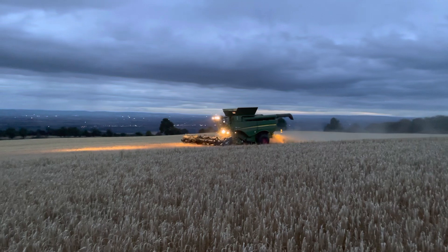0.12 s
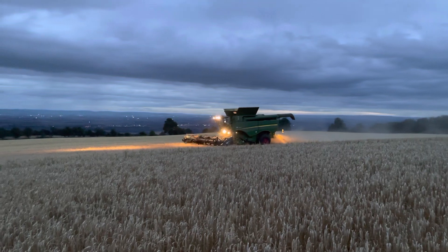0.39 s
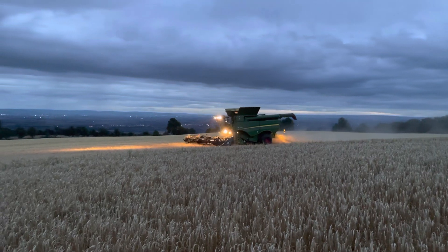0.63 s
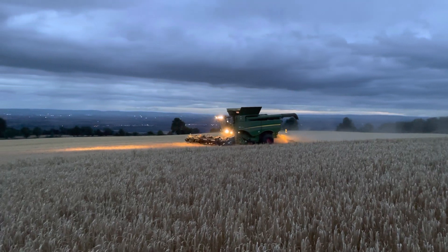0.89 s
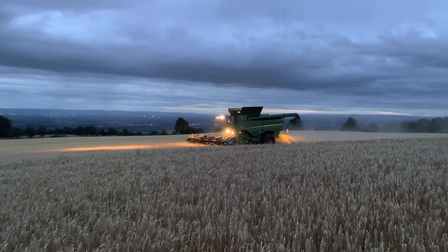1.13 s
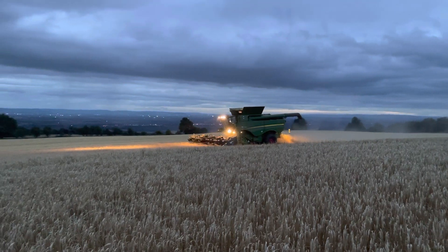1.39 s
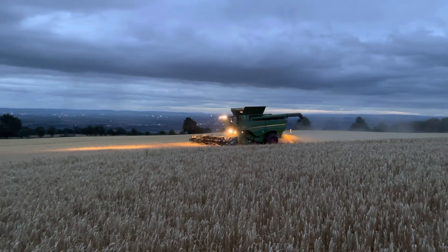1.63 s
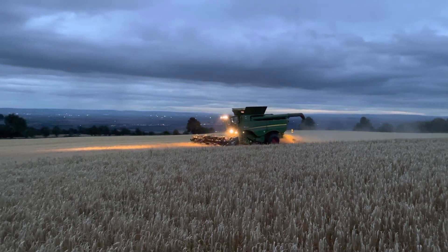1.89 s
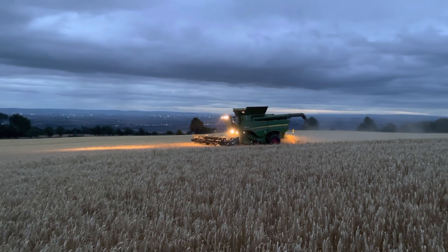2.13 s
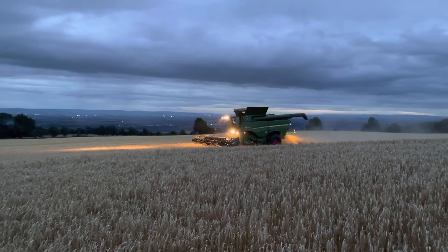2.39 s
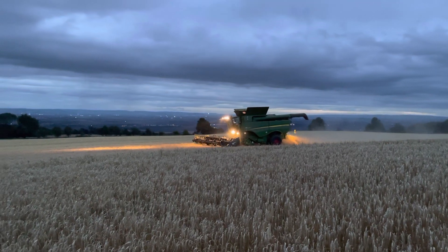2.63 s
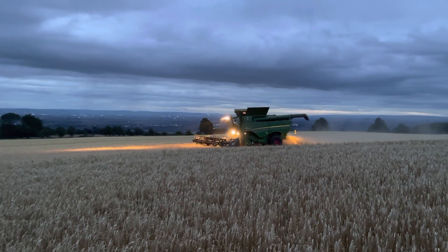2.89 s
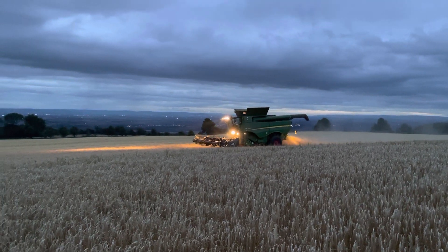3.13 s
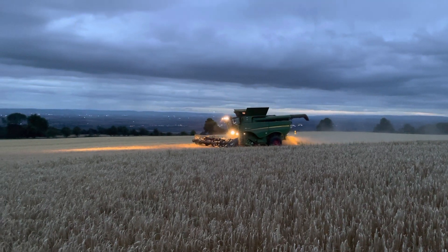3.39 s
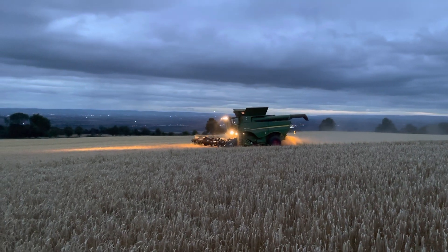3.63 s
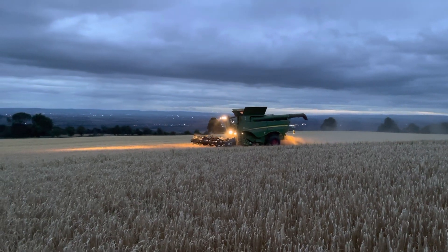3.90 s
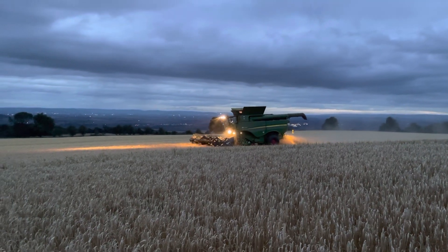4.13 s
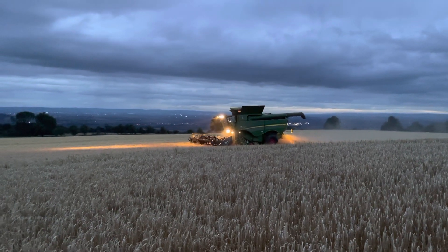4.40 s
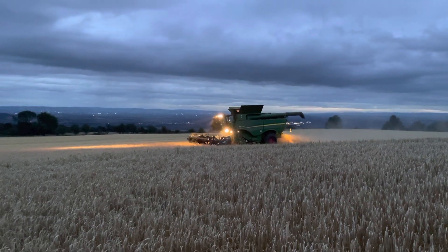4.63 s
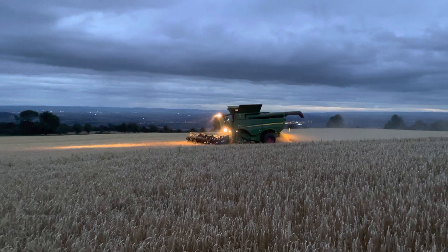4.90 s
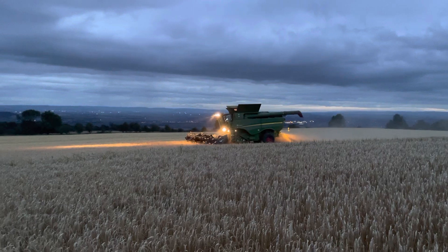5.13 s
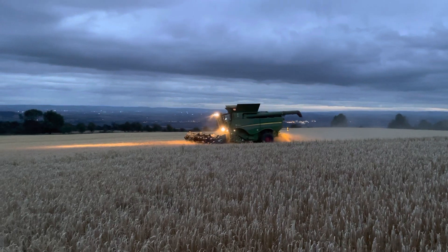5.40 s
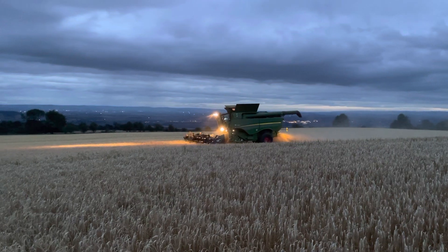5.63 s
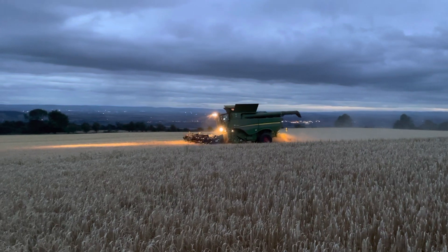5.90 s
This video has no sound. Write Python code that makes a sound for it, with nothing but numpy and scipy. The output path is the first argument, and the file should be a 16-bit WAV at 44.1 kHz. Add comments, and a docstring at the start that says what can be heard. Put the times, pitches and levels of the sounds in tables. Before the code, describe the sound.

Continuous harvester noise outdoors, at a distance, picked up by a phone in stereo. Low, smooth engine humming and heavy machinery roar dominate from beginning to end, flickering only slightly. Over them lie faint gear and rotor tones, an unsteady whine that weakens after the first couple of seconds, a very thin turbo whistle, and airy straw hiss that settles a little, then brightens. The middle range is weaker on the right.

```python
"""Combine harvester in a wheat field

A combine works some way off at steady engine speed, heard on a two-port phone. A six-cylinder diesel drones
under chopper, rotor and gear tones, a pump whine and a thin turbo whistle, all sums of unsteady sines.
Machinery roars and chopped straw hisses, both as coloured noise swelling and flickering in half-octave bands.
The right channel hears the middle range weaker and again three milliseconds late."""
import sys
import numpy as np
from scipy import signal
from scipy.fft import rfft, irfft
from scipy.io import wavfile
from scipy.ndimage import uniform_filter1d

SR = 44100
rng = np.random.default_rng(int(sys.argv[2]) if len(sys.argv) > 2 else 0)


def master_out(mix):
    """Clip the mix to full scale and print it as 16-bit PCM to the path in sys.argv[1]."""
    frames = np.transpose(np.atleast_2d(mix))
    ceiling = np.clip(frames, -1, 1)
    pcm = np.round(ceiling * 32767).astype(np.int16)
    wavfile.write(sys.argv[1], SR, pcm)


def level_to_linear(level):
    """Convert decibel levels to linear amplitude factors, elementwise."""
    exponent = np.asarray(level, float) / 20
    return 10 ** exponent


N = 265482  # samples, about 6 s
T = np.arange(N) / SR
BINS = np.fft.rfftfreq(N, 1 / SR)  # Hz


def walk(rate):
    """Random levels held 1 / rate s, smoothed twice into a wander of mean 0 and spread 1."""
    hold = int(SR / rate)
    steps = np.repeat(rng.standard_normal(N // hold + 1), hold)
    wander = uniform_filter1d(uniform_filter1d(steps, hold), hold)[:N]
    return (wander - wander.mean()) / wander.std()


def curves(table):
    """Columns of a time table, drawn as straight lines from sample to sample."""
    seconds, *columns = np.transpose(table)
    return [np.interp(T, seconds, column) for column in columns]


def partials(hz, orders, drift, waver_db, waver_hz):
    """Sines on multiples of one slightly drifting rate; the air between makes each waver."""
    turns = np.cumsum(hz * (1 + drift * walk(waver_hz / 2))) / SR
    total = 0
    for multiple, db in orders:
        level = np.sqrt(2) * level_to_linear(db + waver_db * walk(waver_hz))  # rms to peak
        total = total + level * np.sin(2 * np.pi * (multiple * turns + rng.random()))
    return total


def noise(spectrum, swell_db, swell_hz, flicker_db, flicker_hz):
    """Two unrelated noises of one colour; half-octave bands swell together and flicker alone."""
    hz, db = np.transpose(spectrum)
    octave = np.log2(BINS + 1)
    colour_db = np.interp(octave, np.log2(hz), db, left=-140, right=-140)
    colour = level_to_linear(colour_db) * np.sqrt(SR / 2)  # turns dB per Hz into gain on white noise
    coloured = rfft(rng.standard_normal((2, N))) * colour
    swell = walk(swell_hz)
    total = 0
    for centre in np.arange(np.floor(np.log2(hz[0])), np.log2(hz[-1]) + 1, .5):
        # overlapping bands that add up to one
        band = np.cos(np.pi / 2 * np.clip(2 * (octave - centre), -1, 1)) ** 2
        level_db = swell_db * swell + flicker_db * walk(flicker_hz)
        total = total + irfft(coloured * band, N) * level_to_linear(level_db)
    return total


# Diesel drone around the firing rate: [multiple of the firing rate, rms level/dB]
ENGINE_ORDERS = [(.5, -43.5), (1, -26), (2, -37.5), (3, -57.5), (4, -62)]


def engine():
    """Six-cylinder diesel: firing pulses repeat evenly, so they sound as multiples of the firing rate."""
    return partials(100, ENGINE_ORDERS, drift=0.00041, waver_db=0.0, waver_hz=8)


# Straw chopper tones: [multiple of its turning rate, typical rms level/dB]
CHOPPER_ORDERS = [(5, -29), (6, -39), (12, -57), (18, -53), (27, -55)]


def chopper():
    """The turning straw chopper sounds on multiples of its shaft rate."""
    return partials(42.66, CHOPPER_ORDERS, drift=0.0018, waver_db=0.23, waver_hz=12)


# Threshing rotor tones: [multiple of its turning rate, typical rms level/dB]
ROTOR_ORDERS = [(8, -41.5), (9, -47), (30, -57), (48, -50), (50, -52), (51, -53), (52, -50), (56, -52),
                (68, -53), (74, -58)]


def rotor():
    """The threshing rotor sounds on high multiples of its slow turning rate."""
    return partials(17.54, ROTOR_ORDERS, drift=0.001995, waver_db=2.5, waver_hz=6)


# Lone shaft and gear tones: [f/Hz, typical rms level/dB]
GEAR_TONES = [(54.5, -37), (74.0, -41), (1359, -57), (1777, -57), (1806, -57), (2210, -60), (3545, -63)]


def gears():
    """Lone shaft and gear tones, each drifting and wavering on its own."""
    return sum(partials(hz, [(1, db)], drift=.0015, waver_db=2.0, waver_hz=10) for hz, db in GEAR_TONES)


# Pump whine, course of its first partial: [t/s, typical rms level/dB]
PUMP_LEVEL = [(0, -36.5), (2.4, -38.5), (3.2, -42), (4.4, -45), (4.9, -41.5), (6.02, -43)]
# Weak upper partials of the pump: [multiple of its pitch, typical rms level/dB]
PUMP_UPPER_ORDERS = [(3, -60), (4, -63)]


def pump():
    """The pump whines on a few partials and grows ragged in pitch and level as its first one fades."""
    first_db, = curves(PUMP_LEVEL)
    # the second partial holds for 1.1 s, then dies away at 6 dB per s to a floor
    second_db = np.maximum(-46 - 6 * np.maximum(T - 1.1, 0), -60)
    ragged_db = 1.6 + .3 * (first_db.max() - first_db)
    orders = [(1, first_db), (2, second_db)] + PUMP_UPPER_ORDERS
    hz = 797.3 * (1 + .0015 * walk(2))
    return partials(hz, orders, drift=.0021 * ragged_db, waver_db=ragged_db, waver_hz=35)


# Turbocharger whistle: [t/s, f/Hz, typical rms level/dB]
TURBO_COURSE = [(0, 3886, -53), (.6, 3904, -56), (1.5, 3884, -54), (2.4, 3896, -58), (3.5, 3882, -60),
                (4.6, 3897, -54), (6.02, 3882, -52)]


def turbo():
    """The turbocharger whistles one thin tone, unsteady in pitch and level."""
    hz, db = curves(TURBO_COURSE)
    return partials(hz, [(1, db)], drift=.0014, waver_db=2.2, waver_hz=25)


# Machinery roar: [f/Hz, level/dB per Hz]
ROAR_SPECTRUM = [(20, -76), (30, -69), (40, -63), (50, -46.5), (85, -44.5), (120, -49), (215, -49),
                 (280, -54), (370, -61.5), (480, -60), (580, -65), (850, -63), (1200, -63), (1450, -66.5),
                 (2000, -70), (3000, -74.5), (3600, -75), (4300, -77), (6300, -86), (9000, -100)]


def machinery_roar():
    """The machinery's broad roar: two unrelated noises of one colour."""
    return noise(ROAR_SPECTRUM, swell_db=0.34, swell_hz=10, flicker_db=0.53, flicker_hz=10)


# Colour of the straw hiss before its level changes: [f/Hz, level/dB per Hz]
STRAW_SPECTRUM = [(4500, -100), (6300, -88), (7200, -80.5), (8600, -78), (10500, -82.5), (12800, -83),
                  (13800, -87), (14600, -95), (15500, -112)]
# Course of the hiss, level and lift of its top: [t/s, change of level/dB, further lift of the top/dB]
HISS_COURSE = [(0, 2.3, -4), (.6, 1.5, -2.5), (1.9, -1, -.5), (2.7, 0.4, 0.5), (3.6, -1.5, 2.5),
               (4.5, -.6, 0.3), (5.3, -1.5, .5), (6.02, 0.5, 1.5)]


def straw_hiss():
    """Chopped straw hisses as two unrelated noises, a little brighter from the middle on."""
    level_db, top_db = curves(HISS_COURSE)
    hiss = noise(STRAW_SPECTRUM, swell_db=0.5, swell_hz=50, flicker_db=0.6, flicker_hz=80)
    top_hz = 10000
    top = irfft(rfft(hiss) / (1 + (top_hz / (BINS + 1)) ** 8), N)
    return (hiss + top * (level_to_linear(top_db) - 1)) * level_to_linear(level_db)


# Right channel against left:
# [f/Hz, direct gain/ratio, direct phase/rad, late gain/ratio, gain of the unrelated noise/dB]
RIGHT_PORT = [(110, 1, -.03, 0, -24), (210, 1, -.16, .03, -20), (450, 1.03, -.2, -.05, -17),
              (650, .81, -.68, .27, -17), (900, .49, -.58, .16, -19), (1250, .47, -.45, -.06, -18),
              (1550, .3, -.71, -.2, -15), (1800, .13, -.42, -.56, -13), (2300, .27, -.51, -.45, -11),
              (2800, .12, -.78, -.42, -11), (3200, .47, -.13, -.12, -11), (3700, .62, -.01, 0, -13),
              (4000, .9, -.01, 0, -12), (5200, .8, -.1, 0, -5), (6200, .6, 1.3, 0, -4),
              (8600, .97, 3.14, 0, -13), (10500, .8, 4.3, 0, -5), (13000, .95, 6.1, 0, -11)]


def two_ports(sound, unrelated):
    """Left hears a trace of the late copy; right a phase-turned direct path, the late copy and own noise."""
    late_ms, late_rad, left_late_share = 3.11, 2.1, 0.12
    hz, *columns = np.transpose(RIGHT_PORT)
    gain, rad, late, own_db = (np.interp(BINS, hz, column) for column in columns)
    delayed = late * np.exp(1j * (late_rad - 2 * np.pi * BINS * late_ms / 1000))
    direct = gain * np.exp(1j * rad)
    left = rfft(sound) * (1 + left_late_share * delayed)
    right = left * (direct + delayed) + rfft(unrelated) * level_to_linear(own_db)
    return irfft(np.array([left, right]), N)


def scene():
    """Tones over roar and straw hiss, spread onto the two channels."""
    tones = engine() + chopper() + rotor() + gears() + pump() + turbo()
    shared, unrelated = machinery_roar() + straw_hiss()
    return two_ports(tones + shared, unrelated)


def low_pass(x):
    """Removes everything above the highest recorded frequency."""
    return signal.sosfilt(signal.butter(12, 15590, fs=SR, output="sos"), x)


def record(dry):
    """The finished two-channel mix as the phone keeps it."""
    return low_pass(dry)


dry = scene()
out = record(dry)
master_out(out)
```